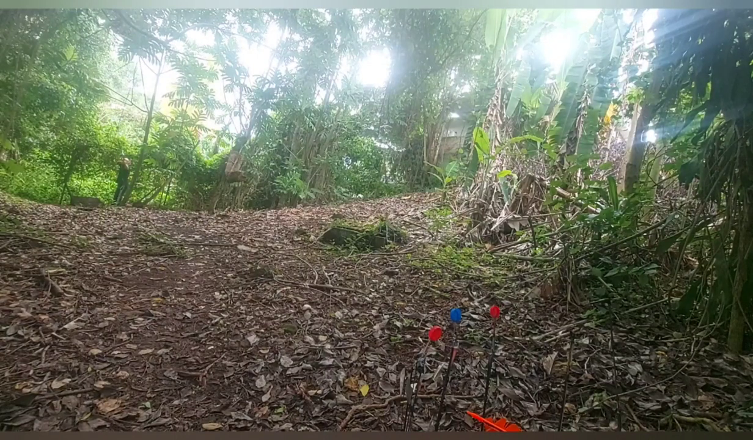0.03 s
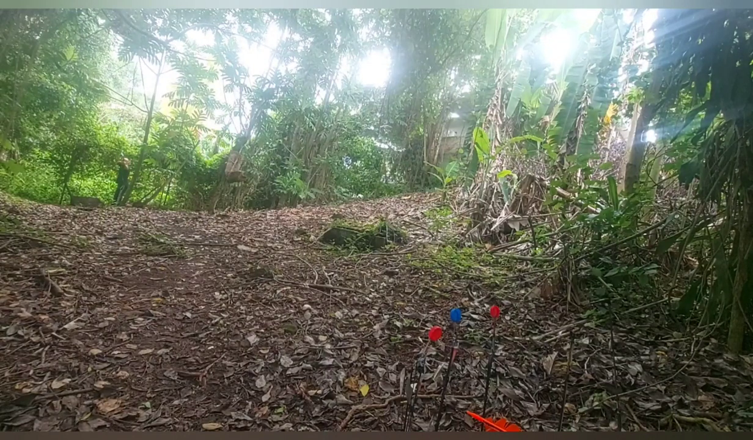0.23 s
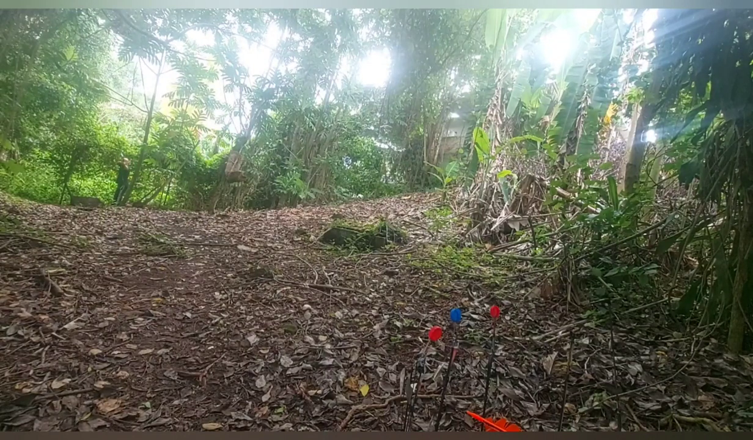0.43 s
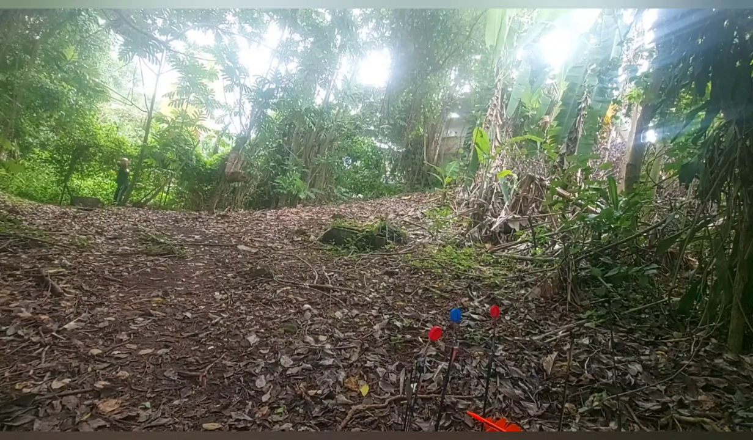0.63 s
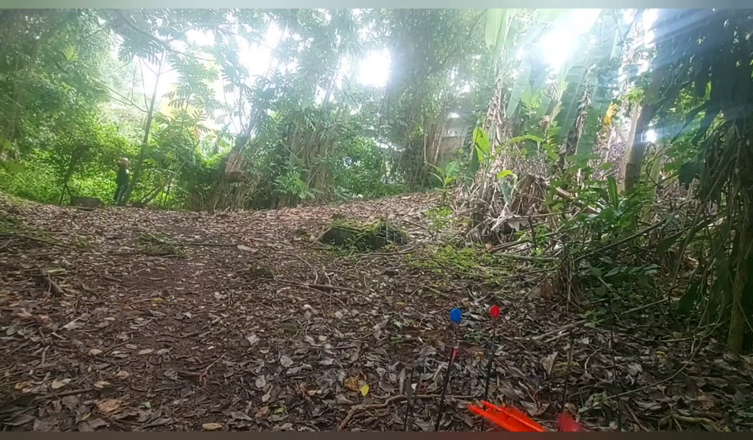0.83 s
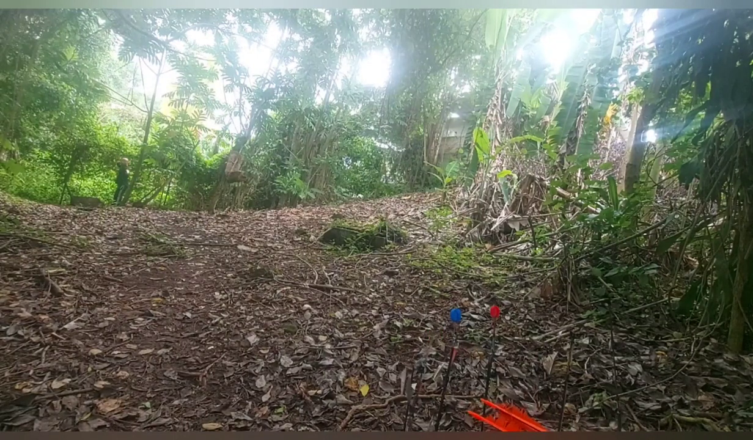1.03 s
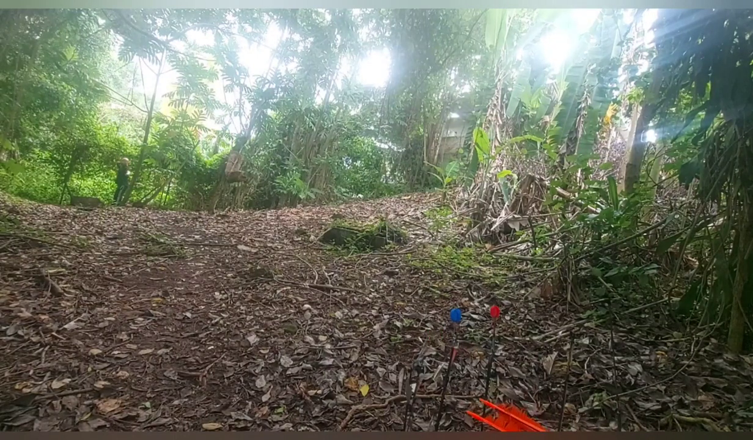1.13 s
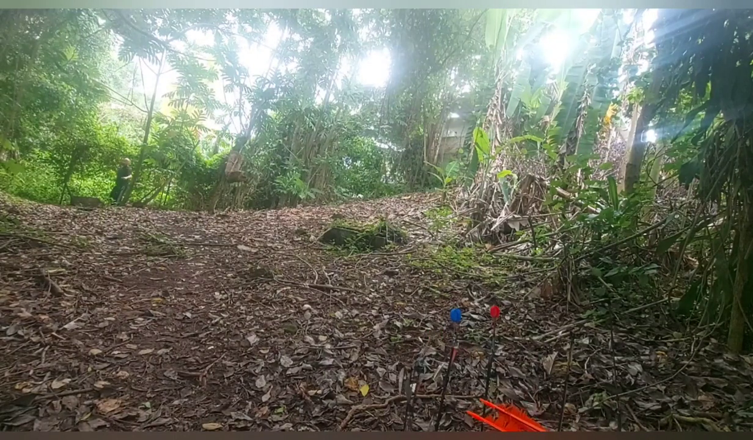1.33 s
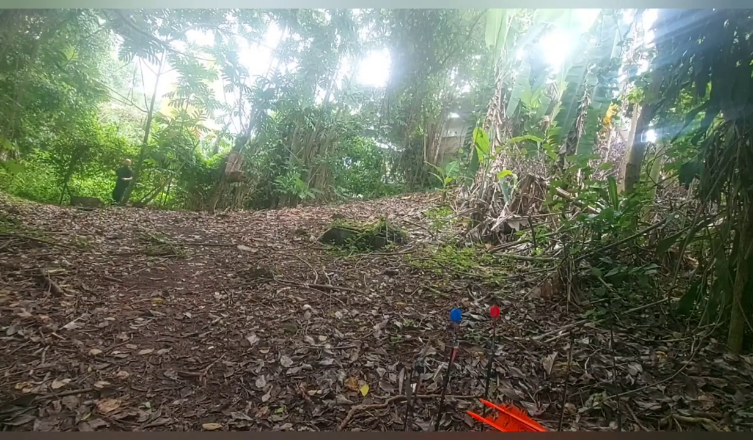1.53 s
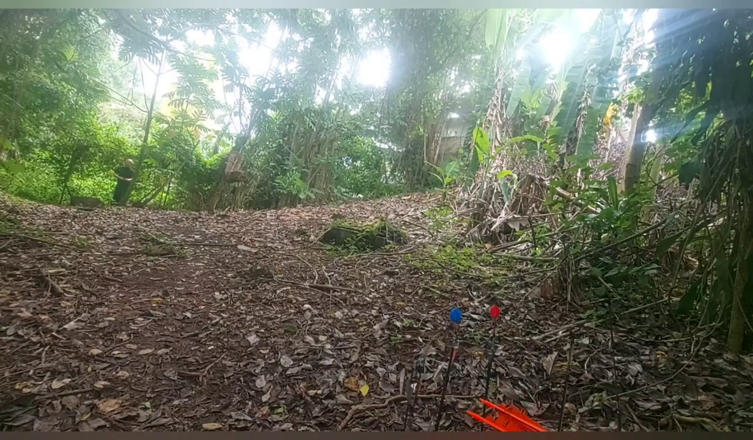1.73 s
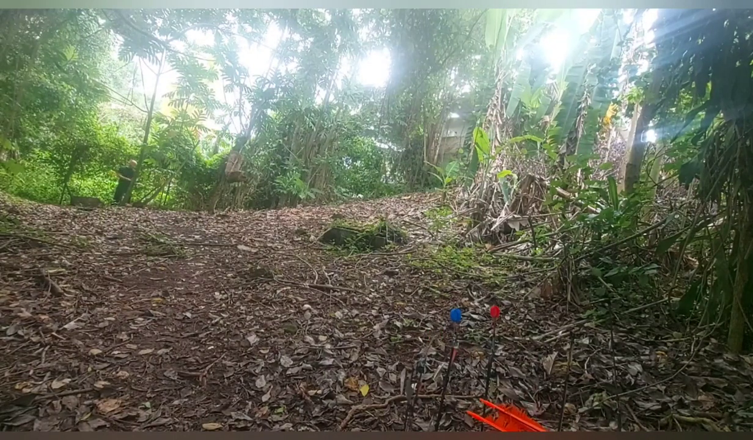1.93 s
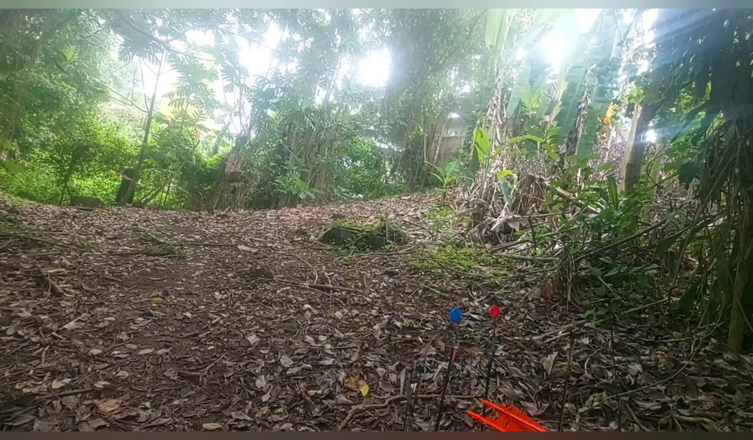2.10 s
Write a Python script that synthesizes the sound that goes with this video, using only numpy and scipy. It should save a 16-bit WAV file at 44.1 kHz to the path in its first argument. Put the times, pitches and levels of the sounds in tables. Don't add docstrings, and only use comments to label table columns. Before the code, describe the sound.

Close to a small camera on the forest floor, an arrow rushes in and hits slightly right with a sharp crunchy crack, leaves patter, a knocked target clicks down, and faint doves coo far away.

```python
import sys
import numpy as np
from scipy import signal
from scipy.fft import rfft, irfft, next_fast_len
from scipy.io import wavfile
from scipy.ndimage import map_coordinates

SR = 44100
rng = np.random.default_rng(int(sys.argv[2]) if len(sys.argv) > 2 else 0)


def persist_wave(psi):
    counts = np.round(np.clip(psi, -1, 1) * 32767).astype(np.int16)
    wavfile.write(sys.argv[1], SR, np.atleast_2d(counts).T)


def ratio_of_db(decibels):
    return 10 ** (np.asarray(decibels, float) / 20)


N = 95388
T = np.arange(N) / SR

# f/Hz, level/dB per Hz
FOREST_COLOUR = [(12, -66), (20, -36), (60, -1.5), (150, -11.5), (293, -6.5), (446, -5), (527, -3.5),
                 (12400, -25), (16000, -32.5)]
# f/Hz, likeness
FOREST_ALIKE = [(60, 0.99), (240, 0.24), (950, -0.01), (3770, -0.077), (15000, 0.074)]
# t/s, level/dB
BREEZE = [(0, 1.5), (.4, 1.5), (1.2, 1.5), (1.6, -0.5), (2.16, 0.5)]
# f/Hz, width/Hz, level/dB
DRONE = [(67, 140, -85.5), (323, 120, -79.5)]
# t/s, level/dB
INSECT = [
    (.3, -95),
    (.37, -75.5),
    (.5, -85),
    (.56, -96),
]
# t/s, length/s
COO_TIMES = [(.46, .115), (1.67, .075), (1.745, .055), (1.79, .045), (1.865, .06), (1.93, .035),
             (1.975, .065), (2.09, .04), (2.13, .07), (1.62, .085), (1.64, .055), (1.48, .14)]
# f/Hz, level/dB, scoop from below/Hz, scoop time/s
COO_NOTES = [(655, -59, 110, .022), (655, -58, 60, .03), (662, -72, 0, .02), (605, -69, 0, .02),
             (672, -69, 0, .02), (672, -71, 0, .02), (668, -73, 10, .02), (605, -69, 0, .02),
             (630, -64, 0, .02), (540, -71, 40, .04), (310, -73, 0, .02), (300, -76, 20, .1)]
# t/s, level/dB, rise/s, fall by 60 dB/s, left over right/dB
CRUSH = [(.783, -29, 0.00097, 0.041, -3.5), (0.797, -34.5, 0.00067, .012, -8.5),
         (.81, -36, 0.0027, 0.11, -2.5), (0.789, -34.5, 0.0057, .33, 0.5), (.9, -84.5, 0.039, 0.59, 3),
         (1.0305, -45.5, 0.0006, 0.047, -5), (1.047, -51.5, 0.0076, 0.27, -0.5),
         (1.19, -67, 0.0035, 0.17, -16.5), (.32, -67.5, 0.0088, 0.28, 2), (1.32, -70, 0.011, 0.24, -6),
         (1.42, -75.5, 0.014, .15, -5), (2.1, -79.5, 0.011, 0.096, 4.5)]
# f/Hz, level/dB per Hz
LEAF_COLOUR = [(180, -36.5), (300, -3), (801, -7), (1170, -12.5), (1390, -6.5), (2480, -10), (3950, -7),
               (12100, -13), (16000, -16)]
# f/Hz, likeness
LEAF_ALIKE = [(700, 0.93), (1400, 0.41), (2500, 0.14), (12000, .4)]
# t/s, peak level/dB, f/Hz, left over right/dB
SNAPS = [(.498, -55, 12500, -7), (.7965, -24, 7600, -10), (.8095, -32, 2300, -4), (.8105, -32, 7500, -6),
         (.8125, -34, 7000, -4), (.8222, -35, 6000, -5), (.857, -43, 6500, -3), (.927, -55.5, 2506, -4),
         (.983, -46, 3300, -10), (.988, -52, 9000, -2), (1.0275, -32, 2600, -1), (1.0281, -34, 8500, -3),
         (1.0303, -31, 5900, -7), (1.0304, -30, 13500, -4), (1.0325, -30, 3800, -3),
         (1.0326, -33, 11000, 1), (1.0441, -36, 2000, 0), (1.0464, -43, 7900, -8), (1.051, -44, 7800, -9),
         (1.129, -51, 9500, -10), (1.179, -52, 11000, -3), (1.1897, -42, 2900, 8), (1.1898, -50, 10500, 5),
         (1.1915, -47, 2300, 9), (1.22, -53, 5990, 2), (1.315, -55, 11910, -3.5)]
DROP_TIMES = [1.0277, 1.028, 1.0447, 1.03]
# f/Hz, level/dB, fall by 60 dB/s, attack/s
DROP_TONES = [(844, -40.5, 0.018, 0.00057), (300, -46, 0.046, 0.0008), (595, -47, 0.02, 0.00033),
              (159, -52, 0.093, 0.0032)]
# f/Hz, level/dB, fall by 60 dB/s
BOW_LIMBS = [(350, 0, .04)]
# t/s, f/Hz, level/dB, fall by 60 dB/s, attack/s
STRING = [(.5535, 630, -46, .04, .001), (.554, 1070, -56, .05, .001), (.565, 1061, -47, .13, .006),
          (.567, 80, -50, .15, .005), (.567, 194, -48, .05, .003), (.568, 1750, -55, .3, .005),
          (.575, 2180, -54, .2, .006)]
# t/s, level/dB
FLIGHT = [(.552, -85), (.556, -59), (.565, -57), (.57, -40), (.59, -40), (.62, -45.5), (.68, -53),
          (.735, -53), (.775, -44)]
# f/Hz, level/dB
FLIGHT_COLOUR = [(60, -21.5), (150, -16), (700, -14), (1300, -21), (2400, -16.5), (4200, -10.5),
                 (11000, -13.5), (16000, -21.5)]
# t/s, f/Hz, level/dB
WHISTLE = [(.575, 860, -75), (.598, 859, -55), (.66, 852, -57), (.69, 848, -55), (.765, 838, -57),
           (.778, 836, -66)]
# multiple of its pitch, level/dB, change of level/dB per s
OVERTONES = [(.6, -14, 25), (.848, -3, -45)]
# t/s, level/dB
PIERCE = [(.7755, -50), (.7768, -25), (.778, -14.5), (.7792, -22), (.781, -27), (.7825, -22), (.7845, -38)]
# f/Hz, level/dB per Hz
RIP_COLOUR = [(400, -26), (1000, -6.5), (2500, -2), (5000, 1.5), (9000, -2.5), (13000, -1.5), (16000, -6)]
CRACK_TIMES = [.7793, .77932, .78066, .7807, .7813]
# f/Hz, level/dB, fall by 60 dB/s, attack/s
CRACKS = [(950, -2, .006, .0001), (4000, 2, .0028, .0003), (2650, 5.5, .0019, .00015),
          (7200, -6, .003, .0001), (900, -14, .008, .0001)]
RING_TIMES = [.7797, .7797, .786, .7914, .7992, .7945, .806, .797, .8095, .8072, .8103]
# f/Hz, level/dB, fall by 60 dB/s, attack/s
RING_TONES = [(340, -11, .04, .0008), (470, -24, .015, .0005), (207, -25, .08, .002),
              (149, -12, .088, .008), (282, -21, .05, .001), (80, -18, .08, .008), (420, -31, .07, .002),
              (560, -29, .04, .001), (620, -28, .04, .001), (80, -11, .07, .008), (282, -28, .05, .001)]

EAR_LAG_S = .00036


def unit(x):
    return x / np.sqrt(np.mean(x ** 2) + 1e-20)


def along(points, hz):
    f, value = np.transpose(points)
    return np.interp(np.log(hz + 1), np.log(f + 1), value)


def level_over_time(points):
    return np.interp(T, *np.transpose(points), -150, -150)


def wobble(rate):
    return map_coordinates(rng.standard_normal(int(N * rate / SR) + 4), [T * rate])


def filtered(x, response):
    m = next_fast_len(N + 8192)
    return irfft(rfft(x, m) * response(np.fft.rfftfreq(m, 1 / SR)), m)[..., :N]


def rush(colour, alike):
    def mid_and_side(hz):
        turn = np.arccos(np.clip(along(alike, hz), -1, 1)) / 2
        return ratio_of_db(along(colour, hz)) * [np.cos(turn), np.sin(turn)]
    mid, side = filtered(rng.standard_normal((2, N)), mid_and_side)
    return unit(np.array([mid + side, mid - side]))


def hum_band(center_hz, width_hz):
    noise = rng.standard_normal(N)
    return unit(filtered(noise, lambda hz: 1 / (1 + ((hz - center_hz) / width_hz * 2) ** 2)))


def ring(s, hz, db, t60, attack):
    t = np.maximum(T - s, 0)
    return ratio_of_db(db - 60 * t / t60) * np.sin(2 * np.pi * hz * t) * (1 - np.exp(-t / attack))


def sides(db):
    return ratio_of_db([[db / 2], [-db / 2]])


def from_right(x):
    shadow_hz, right_db = 4360, .9

    def left_and_right(hz):
        left = np.exp(-2j * np.pi * hz * EAR_LAG_S) / (1 + 1j * hz / shadow_hz)
        return np.array([left, ratio_of_db(right_db) + 0 * hz])
    return filtered(x, left_and_right)


def trees(x):
    t60_s, level_db = .35, -25.5
    tail = rng.standard_normal((2, SR // 2)) * ratio_of_db(-60 * T[:SR // 2] / t60_s)
    delayed = np.pad(x, (400, 0))[None]
    wet = signal.fftconvolve(delayed, tail / np.linalg.norm(tail[0]), axes=1)[:, :N]
    return ratio_of_db(level_db) * wet


def forest():
    air_db, insect_hz, pan_db = -68.5, 1702, 3.5
    drone = sum(ratio_of_db(db + 2.5 * wobble(12)) * hum_band(hz, width) for hz, width, db in DRONE)
    breeze_db = np.interp(T, *np.transpose(BREEZE)) + 0.32 * wobble(7)
    air = ratio_of_db(air_db + breeze_db) * rush(FOREST_COLOUR, FOREST_ALIKE)
    insect = ratio_of_db(level_over_time(INSECT)) * hum_band(insect_hz, 66)
    return sides(pan_db) * (air + drone) + insect


def doves():
    swell, edge = 1.1, .8
    coos, drift_hz, flutter_db = 0, 14 * wobble(60), 1.8 * wobble(60.25)
    for (s, length), (hz, db, scoop_hz, scoop_s) in zip(COO_TIMES, COO_NOTES):
        u = np.clip((T - s) / length, 0, 1)
        pitch = hz - scoop_hz * np.exp(-(u * length / scoop_s) ** 0.77) + drift_hz
        shape = np.abs(np.sin(np.pi * u ** swell)) ** edge
        coos = coos + ratio_of_db(db + 1.5 + flutter_db) * shape * np.sin(2 * np.pi * np.cumsum(pitch) / SR)
    return coos * sides(1.5)


def target_drop():
    return sum(ring(s, *tone) for s, tone in zip(DROP_TIMES, DROP_TONES))


def litter():
    target_lag = round(.0002 * SR)
    level = 0
    for s, db, rise, t60, pan in CRUSH:
        fade_db = np.where(T < s, 4.7 * (s - T) / rise, 60 * (T - s) / t60)
        level = level + sides(pan) * ratio_of_db(db - fade_db)
    grit = ratio_of_db(2 * wobble(900) + .8 * wobble(150))
    crush = level * unit(grit * rush(LEAF_COLOUR, LEAF_ALIKE))
    near, far = np.roll(crush[0], round(EAR_LAG_S * SR)), np.roll(crush[0], target_lag)
    crush[0] = np.where(T < 1, near, far)

    cycles, fray_db, fray_t60_s, low_hz = 3.5, -12, .008, 1500
    snaps, rattle = 0, 1 + 1.6 * rng.standard_normal((2, N))
    for s, db, hz, pan in SNAPS:
        snap = -ring(s, hz, db + 10, cycles / hz, 1e-5)
        fray = ring(s, hz, db + fray_db, fray_t60_s, 1e-4) * rattle
        snaps = snaps + sides(pan) * (np.array([np.roll(snap, target_lag), snap]) + fray)
    snaps = filtered(snaps, lambda hz: (1j * hz / low_hz / (1 + 1j * hz / low_hz)) ** 3)
    return crush + snaps


def flight():
    bow_s, bow_db, attack_s = .5687, -23.5, .008
    rebound_s, rebound_db = .0115, -2
    bow = 0
    for hz, db, t60 in BOW_LIMBS:
        for k in range(3):
            knock = ring(bow_s + k * rebound_s, hz, bow_db + db + k * rebound_db, t60, attack_s)
            bow = bow + (-1) ** k * knock
    string = sum(ring(*row) for row in STRING)
    air_level = ratio_of_db(level_over_time(FLIGHT) + 0.36 * wobble(140))
    air = air_level * rush(FLIGHT_COLOUR, [(1000, 0.76), (8000, 0.43)])

    s, hz, db = np.transpose(WHISTLE)
    level, pitch = level_over_time(np.transpose([s, db])), np.interp(T, s, hz)

    def tone(multiple, db, drift_hz):
        phase = 2 * np.pi * np.cumsum(multiple * pitch + drift_hz * wobble(60)) / SR
        return ratio_of_db(level + db + 1.5 * wobble(43)) * np.sin(phase)
    whistle, since = tone(0.99, 0, 4), T - bow_s
    for multiple, db, swell_db in OVERTONES:
        whistle = whistle + tone(multiple + .08 * since, db + swell_db * since, 12)
    return bow + string + air + sides(-1.5) * whistle


def pierce():
    return sides(-4.5) * ratio_of_db(level_over_time(PIERCE)) * rush(RIP_COLOUR, [(1000, 0.7)])


def strike():
    cracks = sum(ring(s, *tone) for s, tone in zip(CRACK_TIMES, CRACKS))
    rings = sum(ring(s, *tone) for s, tone in zip(RING_TIMES, RING_TONES))
    return rings - cracks


def scene():
    hit, coo = strike(), doves()
    background = forest() + coo + ratio_of_db(19) * trees(coo[0])
    leaves = litter() + target_drop() + pierce()
    return background + leaves + flight() + from_right(hit) + trees(hit)


def top_cut(x):
    return signal.sosfilt(signal.butter(12, 16980, fs=SR, output="sos"), x)


def record(dry):
    low_hz, top_hz = 45, 16000

    def camera(hz):
        low_cut = (1j * hz) ** 2 / ((1j * hz) ** 2 + 1.3j * hz * low_hz + low_hz ** 2)
        return low_cut / (1 + (hz / top_hz) ** 60)
    return top_cut(filtered(dry, camera))


dry = scene()
out = record(dry)
persist_wave(out)
```